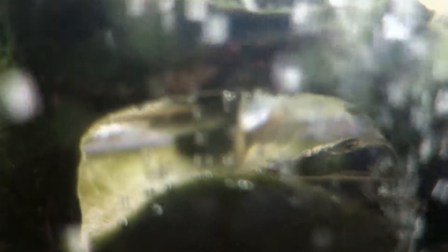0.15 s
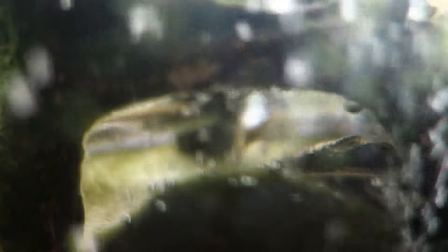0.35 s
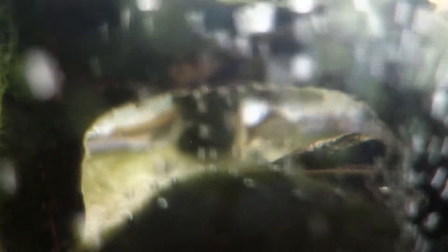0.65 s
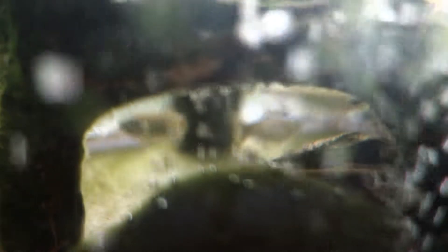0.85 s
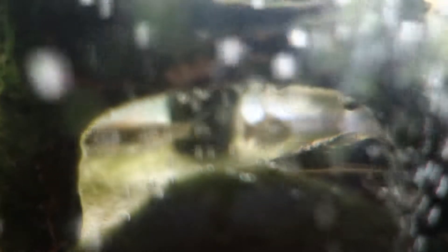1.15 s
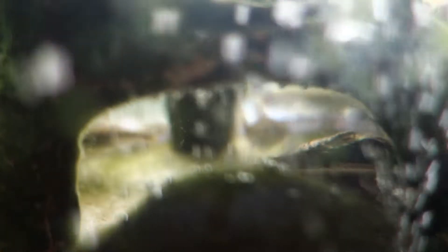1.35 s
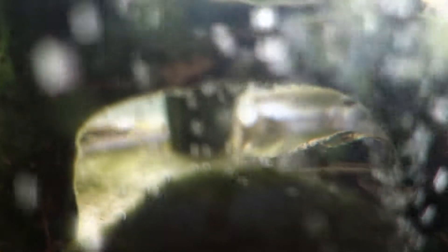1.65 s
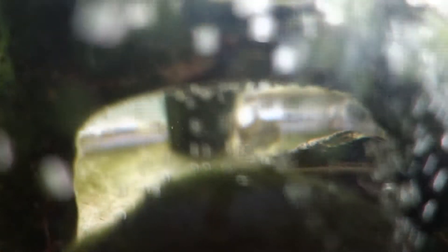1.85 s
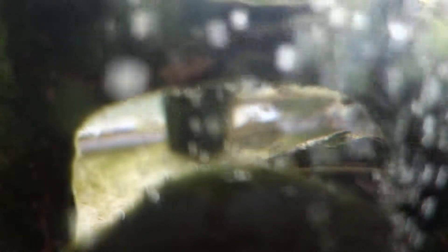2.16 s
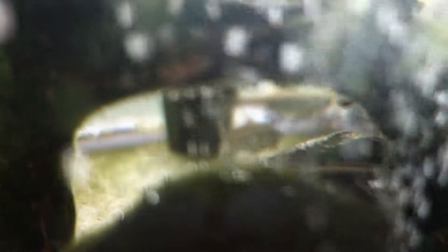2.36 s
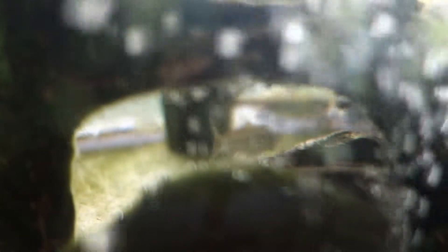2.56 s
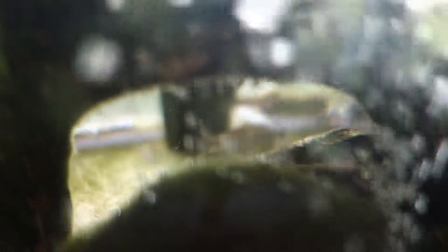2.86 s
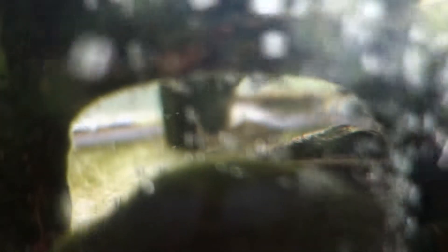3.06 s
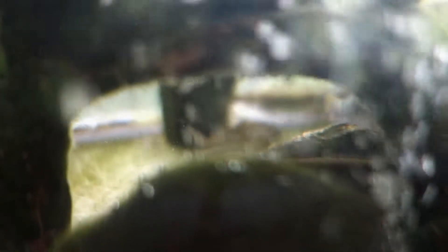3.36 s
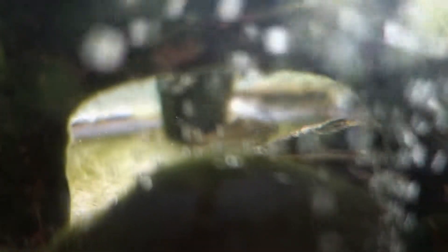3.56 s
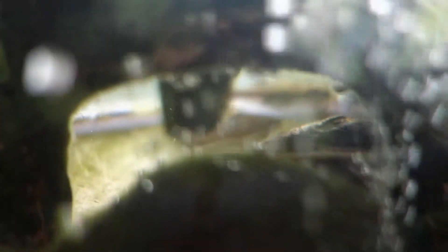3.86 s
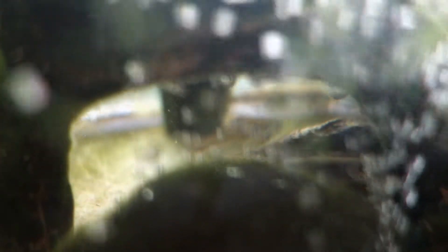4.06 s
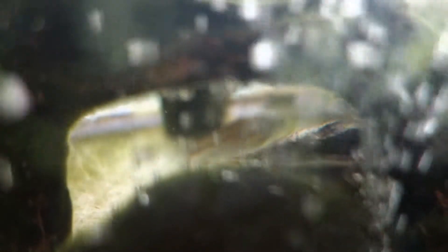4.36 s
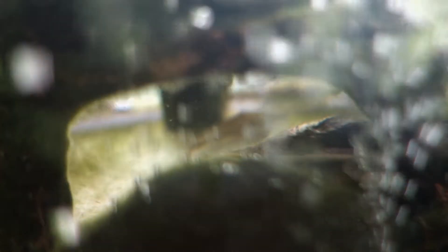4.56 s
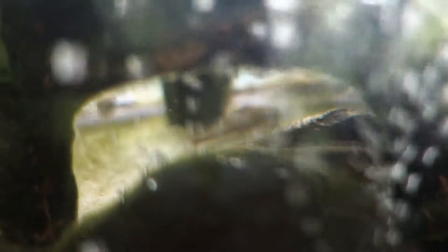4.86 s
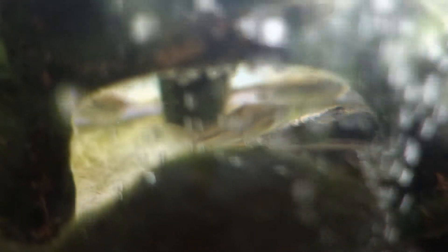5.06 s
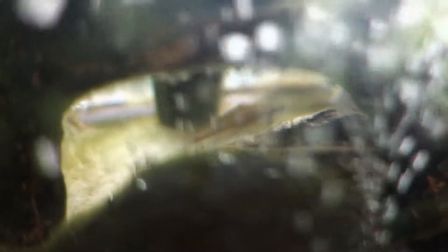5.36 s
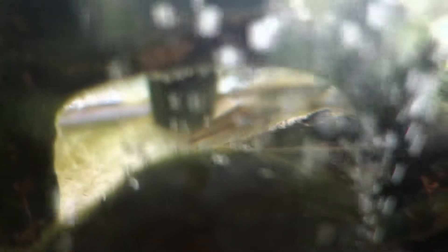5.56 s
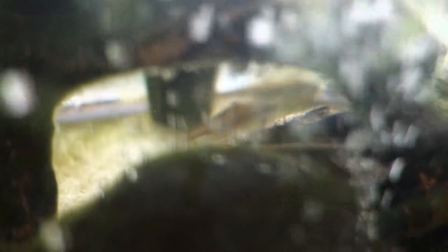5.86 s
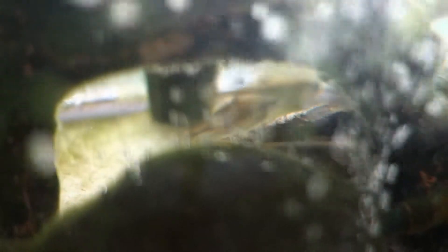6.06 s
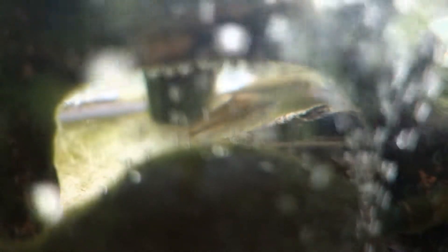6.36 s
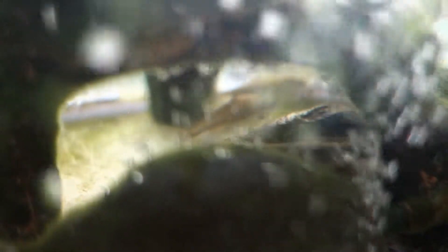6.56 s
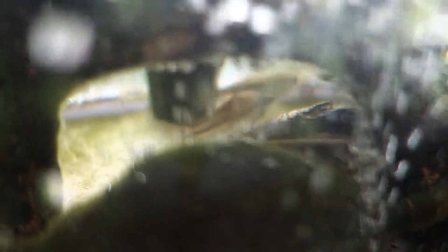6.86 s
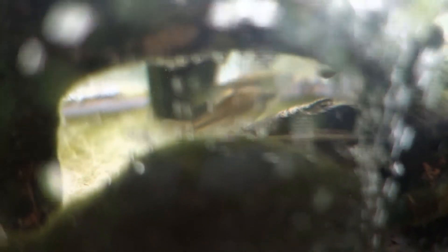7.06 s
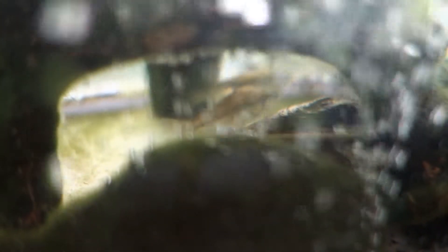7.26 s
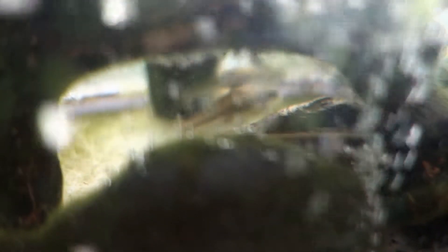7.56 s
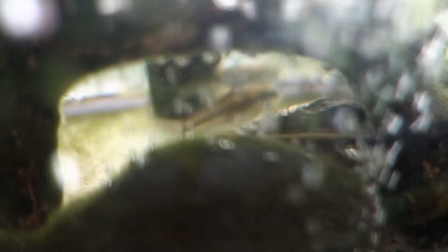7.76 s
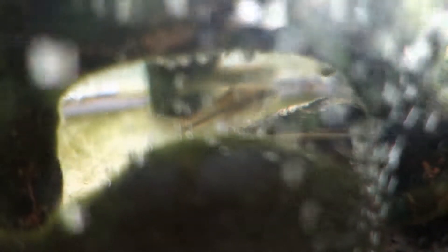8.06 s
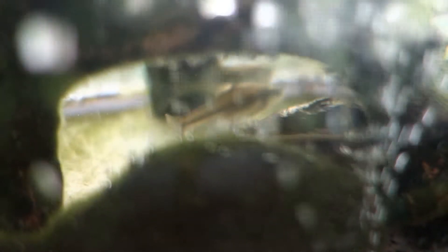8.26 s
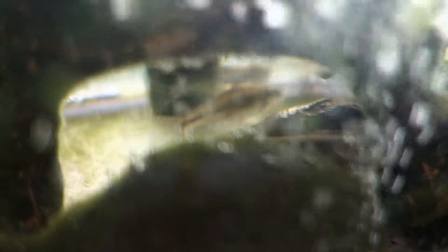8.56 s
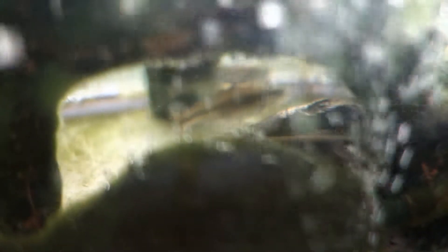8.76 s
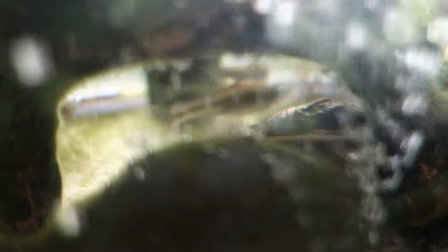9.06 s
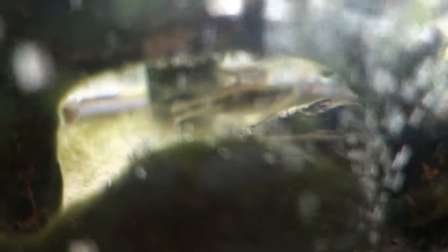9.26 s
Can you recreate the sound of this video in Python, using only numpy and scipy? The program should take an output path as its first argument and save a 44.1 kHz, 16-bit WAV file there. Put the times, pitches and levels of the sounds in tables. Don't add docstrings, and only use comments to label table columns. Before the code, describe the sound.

Close to aquarium glass, an air pump hums and buzzes while bubbles gurgle rapidly and steadily, with tiny pops and two small plastic taps.

```python
import sys
import numpy as np
from scipy import signal
from scipy.fft import rfft, irfft
from scipy.io import wavfile

SR = 44100
rng = np.random.default_rng(int(sys.argv[2]) if len(sys.argv) > 2 else 0)


def field_ratio(decibels):
    return 10 ** (np.asarray(decibels, dtype=float) / 20)


def master(y):
    cut = np.clip(np.atleast_2d(y).T, -1, 1)
    pcm = np.round(cut * 32767)
    wavfile.write(sys.argv[1], SR, pcm.astype(np.int16))


N = 415422
TIME = np.arange(N) / SR
STROKE_HZ = 60.041
FIZZ_DB = -47.5


def rms_one(x):
    return x / np.sqrt(np.mean(x ** 2) + 1e-20)


def at_hz(points, hz):
    points = np.array(points)
    return np.interp(np.log(hz), np.log(points[:, 0] + 1e-9), points[:, 1])


def at_s(rows, s, width):
    at, db = np.transpose(rows)
    distance = (np.asarray(s)[:, None] - at) / width
    return np.exp(-0.5 * distance ** 2) @ db


def drift(rate):
    r = np.exp(-80 * np.pi * rate / SR)
    white = rng.standard_normal(N // 40 + 2002)
    slow = signal.lfilter([1], [1, -2 * r, r * r], white)[2000:]
    return np.interp(np.arange(N) / 40, np.arange(len(slow)), rms_one(slow))


def ring(clicks, hz, t60):
    r, w = field_ratio(-60 / (t60 * SR)), 2 * np.pi * hz / SR
    return signal.lfilter([0, np.sin(w)], [1, -2 * r * np.cos(w), r * r], clicks + 1e-18)


def bubbles(s, db, hz, cycles, rise, onset_s, size, sway=0):
    s, db, hz = (np.asarray(v, float)[:, None] for v in (s, db, hz))
    age = np.arange(size) / SR
    decay = hz * age / cycles
    onset = (1 - np.exp(-age / onset_s)) ** 2
    tone = np.sin(2 * np.pi * hz * age * (1 + rise * decay))
    shape = field_ratio(db - 60 * decay) * onset * tone
    shape *= 1 - (np.arange(size) / size) ** 4
    leaning = shape * np.reshape(sway, (-1, 1))
    at = np.clip((s * SR).astype(int) + np.arange(size), 0, N).ravel()
    mid, side = (np.bincount(at, v.ravel(), N + 1)[:N] for v in (shape, leaning))
    return np.array([mid + side, mid - side])


def room(x, t60, wet_db):
    age = np.arange(SR // 4) / SR
    white = rng.standard_normal((2, len(age)))
    bright = signal.lfilter([1, -0.85], [1, -0.6], white)
    tail = bright * field_ratio(-60 * age / t60) * (age > 0.002)
    tail *= field_ratio(wet_db) / np.sqrt(np.sum(tail ** 2, axis=1, keepdims=True))
    tail[0, 1], tail[1, 0] = 1, 1
    return signal.fftconvolve(x * np.ones((2, 1)), tail, axes=1)[:, :N]


def stroke_swell(depth_db, start):
    phase = (STROKE_HZ * TIME - start) % 1
    return field_ratio(depth_db * np.exp(-3.0 * phase))


def room_tone():
    # (frequency [Hz], level per Hz [dB])
    spectrum = [(25, -16), (50, -13), (90, -1), (250, -2), (740, -1.5), (900, 3), (1800, -0.5), (2600, -8),
                (3300, -16), (5000, -16.5), (6600, -18), (7150, -15.5), (7900, -20), (8700, -19),
                (11500, -17.5)]
    # (frequency [Hz], left-right likeness [-1 to 1])
    likeness = [(60, 0.97), (130, 0.95), (270, 0.89), (570, 0.83), (1200, 0.9), (2550, 0.29), (5400, 0.14),
                (11400, -0.17)]
    edges = 25 * 2 ** np.arange(0, 9.1, 1 / 3)
    white = rng.standard_normal((2, 2, N))
    spray = field_ratio(-2 + 0.5 * drift(14)) * stroke_swell(3.6, 0.94)
    out = 0
    for k, (low, high) in enumerate(zip(edges, edges[1:])):
        band = signal.butter(2, [low, high], "band", fs=SR, output="sos")
        mid, side = signal.sosfilt(band, white[k % 2])
        hz = np.sqrt(low * high)
        alike = np.clip(at_hz(likeness, hz), -1, 1)
        gain = field_ratio(at_hz(spectrum, hz))
        if hz > 3000:
            gain = gain * spray * field_ratio(2.0 * drift(31))
        out = out + gain * (np.sqrt(1 + alike) * mid + np.sqrt(1 - alike) * side * [[1], [-1]])
    return field_ratio(-46.5) * rms_one(out)


def hum():
    # (multiple of the stroke rate, rms level [dB])
    overtones = [(1.0, -62.5), (2.0, -53.5), (3.0, -66.5), (4.0, -78), (5.0, -74), (6.0, -86), (7.0, -70),
                 (8.0, -73), (9.0, -72), (10.0, -77), (11.0, -67), (12.0, -94)]
    # (frequency [Hz], rms level [dB])
    motors = [(42.1, -72.5), (54.14, -78), (83.4, -83), (86.3, -77), (87.04, -67), (163.3, -72)]
    tones = [(k * STROKE_HZ, db + 0.2 * (k - 1) * drift(5.8)) for k, db in overtones]
    tones += [(hz, db) for hz, db in motors]
    return sum(field_ratio(db + 3.5) * np.sin(2 * np.pi * (hz * TIME + rng.random())) for hz, db in tones)


def taps():
    # (time [s], level [dB], left-right difference [dB], bright mode level [dB])
    knocks = [
        (6.5003, -22, -2, -16.5),
        (6.5058, -25, 3, -34),
        (6.5137, -34, 4, -40),
        (7.4409, -8, 2.5, -48),
        (7.4439, -19, -1, -50),
        (7.4555, -29, 2, -48),
        (7.459, -23, 2, -48),
        (7.4742, -26, 0, -48),
    ]
    # (frequency [Hz], level [dB], t60 [s])
    modes = [(260, -25, 0.057), (418, -23.5, 0.081), (793, -20, 0.091), (1077, -15.5, 0.062),
             (1280, 8, 0.011), (1342, 7.5, 0.018), (1540, -21, 0.084)]
    # (time [s], peak level [dB], frequency [Hz])
    gulps = [
        (3.526, -38, 500),
        (3.944, -34.5, 517),
    ]
    out = np.zeros((2, N))
    for s, db, pan_db, bright_db in knocks:
        click = np.zeros(N)
        click[int(s * SR)] = field_ratio(db)
        soft = signal.lfilter([0.022], [1, -1.72, 0.7396], click)
        soft = 1.88 * np.diff(soft, prepend=0) * 6
        body = sum(ring(soft, hz, t60) * field_ratio(mode_db) * (-1) ** k
                   for k, (hz, mode_db, t60) in enumerate(modes))
        bright = field_ratio(bright_db) * ring(click, 3680, 0.025)
        out += (body + bright) * field_ratio(np.array([[0.5], [-0.5]]) * pan_db)
    s, db, hz = np.transpose(gulps)
    return out + bubbles(s, db + 9.0, hz, cycles=11.3, rise=0.17, onset_s=0.0011, size=2000)


def splashes():
    # (time [s], level [dB], lowest frequency [Hz], highest frequency [Hz], length [s])
    volleys = [
        (3.1185, -47, 8000, 11500, .014),
        (6.6, -55, 5100, 7900, 0.008),
        (6.5005, -57, 3300, 4300, .006),
        (7.8, -57, 5250, 11000, .02),
        (5.966, -55, 8200, 10000, 0.02),
        (5.51, -52, 5000, 7200, 0.0063),
    ]
    s, db, low_hz, high_hz, length = np.transpose(volleys)[:, :, None]
    late, high = rng.random(size=(2, len(volleys), 14))
    s = s + length * late ** 2
    db = db - 8 * late ** 2
    hz = low_hz * (high_hz / low_hz) ** high
    return bubbles(s.ravel(), db.ravel(), hz.ravel(), cycles=160.0, rise=0.03, onset_s=0.00013, size=500)


def pops():
    # (time [s], peak level [dB], frequency [Hz], left-right difference [dB])
    clear = [(0.1511, -49, 4350, -0.5), (0.5147, -35, 9650, 0.5), (1.7714, -37, 7390, 1.0),
             (1.8477, -46, 4160, 1.5), (2.3466, -45, 7290, 1.0), (2.83, -48, 4730, 3.5),
             (3.1193, -32, 9840, -3), (3.3089, -41, 4280, 0.0), (3.6471, -48, 4300, 7),
             (4.0896, -44, 5690, 1.0), (4.6259, -48, 4170, 0.0), (5.1163, -45, 7250, 1.0),
             (5.4091, -37, 4280, -2.0), (5.5109, -32, 5830, 0.5), (5.5448, -40, 7340, 0.0),
             (5.6555, -42, 4650, 1.0), (5.7558, -40, 6350, 1.0), (5.898, -39, 5400, 0.5),
             (6.6623, -39, 8600, 0.5), (6.8164, -43, 4140, 0.0), (7.0594, -41, 6450, 1.5),
             (7.1147, -39, 4830, -0.5), (7.2938, -44, 4300, -3), (7.6834, -41, 5480, -0.5),
             (7.8396, -41, 4100, 0.0), (7.9104, -47, 4730, 0.5), (7.9563, -48, 5890, 1.0),
             (8.1658, -42, 4820, 0.0), (9.0618, -40, 8540, 0.5), (9.2599, -46, 4500, 0.0)]
    s, db, hz, pan_db = np.transpose(clear)
    draw = rng.random(size=(1600, 4))
    flurry_db = 3.2 * np.minimum(drift(5)[(draw[:, 0] * N).astype(int)], 1.5)
    crackle_db = -65 + flurry_db - 1.7 * np.log(1.02 - draw[:, 2])
    s = np.r_[s, draw[:, 0] * N / SR]
    db = np.r_[db - 4.5, crackle_db]
    hz = np.r_[hz, 3800 * 2.9 ** draw[:, 1]]
    sway = np.r_[pan_db / 17, 1.4 * (draw[:, 3] - 0.45)]
    return bubbles(s, db, hz, cycles=87.0, rise=0.038, onset_s=0.00046, size=600, sway=sway)


def valves():
    # (frequency [Hz], level [dB], t60 [s])
    shell = [(906, -61, 0.027), (1200, -48.5, 0.061), (1450, -59.5, 0.071), (1760, -58.5, 0.017),
             (1910, -46, 0.0076), (2630, -75, 0.016), (3460, -70.5, 0.046), (3820, -77.5, 0.025),
             (4370, -75.5, 0.027), (4600, -74.5, 0.046), (5260, -77, 0.023), (5680, -75, .03),
             (5940, -80.5, .03), (6270, -76, .025), (6930, -79, .018), (7830, -92, 0.026),
             (8260, -74, 0.016)]
    clicks = np.zeros(N)
    strokes = np.arange(N * STROKE_HZ // SR - 1)
    for share, size in [(0.99, 1), (0.49, -field_ratio(-4.5))]:
        at = ((strokes + share) / STROKE_HZ * SR).astype(int)
        at += np.round(2.7e-5 * SR * rng.standard_normal(len(at))).astype(int)
        clicks[at] = size * field_ratio(7.0 + 3.2 * np.clip(rng.standard_normal(len(at)), -2, 2))
    return sum(ring(clicks, hz, t60) * field_ratio(db) * (-1) ** k for k, (hz, db, t60) in enumerate(shell))


def fizz():
    # (frequency [Hz], level per Hz [dB])
    spectrum = [(1500, 6), (1690, -10), (1850, -5.5), (2100, -4), (2320, -9.5), (2700, -9), (3280, -19.5),
                (3700, -21.5), (4500, -27.5)]
    draw = rng.random(size=(11500, 4))
    s, hz = draw[:, 0] * N / SR, 1600 * 2.835 ** draw[:, 1]
    db = at_hz(spectrum, hz) + 6 * np.log2(hz / 2e3) - 0.57 * np.log(1 - draw[:, 2])
    db += 2.1 * np.cos(2 * np.pi * (STROKE_HZ * s - 0.95))
    sway = 1.1 * (draw[:, 3] - 0.5)
    out = bubbles(s, db, hz, cycles=62.0, rise=0.065, onset_s=0.00035, size=500, sway=sway)
    return rms_one(out) * field_ratio(FIZZ_DB + 0.0834 * TIME + 0.41 * drift(0.84) - 4.5)


def third_outlet():
    s = rng.random(size=1500) * N / SR
    chance = rng.standard_normal(size=(3, 1500))
    wander_db = 1.5 * drift(1.3)[(s * SR).astype(int)]
    db = FIZZ_DB + 0.5 * s - 4.0 + wander_db + 2.0 * chance[0]
    hz = 2100 * np.exp(0.036 * chance[1])
    return bubbles(s, db, hz, cycles=126.0, rise=0.0084, onset_s=0.0012, size=800, sway=0.25 * chance[2])


def second_outlet():
    # (time [s], level above the steady patter [dB])
    fits = [(0.14, 0), (0.62, 2), (0.87, 7), (1.65, 5), (2.2, 0), (3.18, 7.5), (3.85, 4.5), (4.33, 2),
            (4.72, 4), (5.33, 8), (5.98, 1.5), (6.42, 4), (6.98, -3), (7.72, 8.5), (8.26, 2), (8.68, 4),
            (9.14, 7.5), (9.33, 5)]
    s = rng.random(size=1500) * N / SR
    chance = rng.standard_normal(size=(3, 1500))
    db = -47.5 + at_s(fits, s, 0.073) + 2.0 * chance[0]
    hz = 1490 * np.exp(0.038 * chance[1])
    return bubbles(s, db, hz, cycles=113.0, rise=0.032, onset_s=0.0013, size=1200, sway=0.065 * chance[2])


def stream():
    # (time [strokes], level [dB])
    releases = [
        (-.12, -2),
        (.45, -5),
        (1.05, 0),
        (1.45, 3),
        (2.05, 0),
        (2.3, 1),
        (2.52, 3.5),
        (2.95, -4),
    ]
    # (time [s], level above the steady stream [dB])
    surges = [(0.0, -5), (0.18, 1), (0.46, -4), (0.97, 1.5), (1.3, -5.5), (2.61, -6.5), (3.0, 0.5),
              (3.19, 2.5), (3.45, -3), (4.17, -4), (4.42, 2), (4.72, 2), (4.93, -5), (5.33, 2), (5.62, -1),
              (5.77, -2), (5.95, 2.5), (6.15, 0), (6.45, 3.5), (7.1, -3.5), (7.78, 1.5), (8.15, -1.5),
              (8.36, 0.5), (8.62, -2.5), (9.3, -1.5)]
    # (time [s], peak level [dB], frequency [Hz])
    loudest = [(0.1525, -28.5, 1194), (0.9537, -29, 1230), (1.5552, -34, 1220), (1.708, -36, 1290),
               (1.7543, -29, 1200), (2.02, -29, 1280), (2.7526, -33, 1213), (2.818, -28, 1280),
               (3.5563, -26.5, 1244), (4.288, -30, 1240), (4.4818, -28, 1245), (4.6852, -30, 1240),
               (4.7496, -25.5, 1227), (5.1494, -25, 1240), (5.438, -32, 1245), (5.618, -26.5, 1190),
               (6.1463, -31, 1280), (6.3468, -27.5, 1213), (6.416, -27.5, 1200), (6.721, -28, 1180),
               (7.2285, -27, 1250), (7.564, -27.5, 1220), (7.7218, -34, 1450), (7.8371, -23, 1240),
               (7.9698, -32, 1200), (8.0295, -25, 1250), (8.115, -35, 1240), (8.369, -26.5, 1245),
               (8.902, -31, 1246), (9.0506, -30, 1220)]
    groups = np.arange(N * STROKE_HZ // SR // 4 + 1)[:, None] * 4
    stroke, release_db = np.repeat(np.transpose(releases), 2, axis=1)
    s = ((groups + np.r_[stroke, 1.3]) / STROKE_HZ).ravel()
    s = s + (s > 6.8) / STROKE_HZ
    s = s + 0.001616 * rng.standard_normal(len(s))
    spread_db = np.r_[np.full(len(stroke), 1.4), 1.5]
    db = np.tile(np.r_[release_db + 3.0, 3.0], len(groups))
    db += np.tile(spread_db, len(groups)) * rng.standard_normal(len(s))

    patter = rng.random(size=3600) * N / SR
    spread = np.r_[np.full(len(s), 0.046), np.full(len(patter), 0.1)]
    s = np.r_[s, patter]
    db = np.r_[db, -4.5 + 1.6 * rng.standard_normal(len(patter))]
    flow_db = at_s(surges, s, 0.07)
    hz = 1212.4 + 13.5 * np.minimum(flow_db, 0)
    hz = hz * np.exp(spread * np.clip(rng.standard_normal(len(s)), -2, 2.4))
    hz[-len(patter):] *= 0.975
    sway = 0.051 * rng.standard_normal(len(s))
    out = bubbles(s, db - 40.5 + flow_db, hz, cycles=66.0, rise=0.05, onset_s=0.0019, size=1250, sway=sway)
    s, db, hz = np.transpose(loudest)
    return out + bubbles(s - 0.001, db + 1.5, hz, cycles=56.0, rise=0.017, onset_s=0.0018, size=1300)


def scene():
    tank = room(stream() + second_outlet() + third_outlet() + fizz(), t60=0.45, wet_db=-11.5)
    close = room(taps() + pops() + splashes(), t60=0.08, wet_db=-15)
    close += room(valves(), t60=0.074, wet_db=-11)
    return tank + close + hum() + room_tone()


def low_pass(x):
    return signal.sosfilt(signal.butter(12, 12030, fs=SR, output="sos"), x)


def record(dry):
    # (frequency [Hz], level [dB])
    port_colour = [(6480, 0.5), (6700, -2.5), (7200, 1), (7550, -2.5), (7850, 0), (8100, -2.5), (8650, 4),
                   (8850, -0.75)]
    # (frequency [Hz], left-right level [dB])
    port_difference = [(600, -0.1), (1200, -1.5), (1850, -.7), (2100, 3.5), (2450, -4.5), (3500, -4.5),
                       (6400, 2), (11000, .5)]
    hz = np.arange(1, N // 2 + 2) * SR / N
    tilt_db = at_hz(port_difference, hz) / 2
    response_db = at_hz(port_colour, hz) + np.array([tilt_db, -tilt_db])
    ports = irfft(rfft(dry) * field_ratio(response_db), N)
    top_cut = signal.ellip(12, 0.5, 70, 11010, fs=SR, output="sos")
    return low_pass(signal.sosfilt(top_cut, ports))


dry = scene()
out = record(dry)
master(out)
```